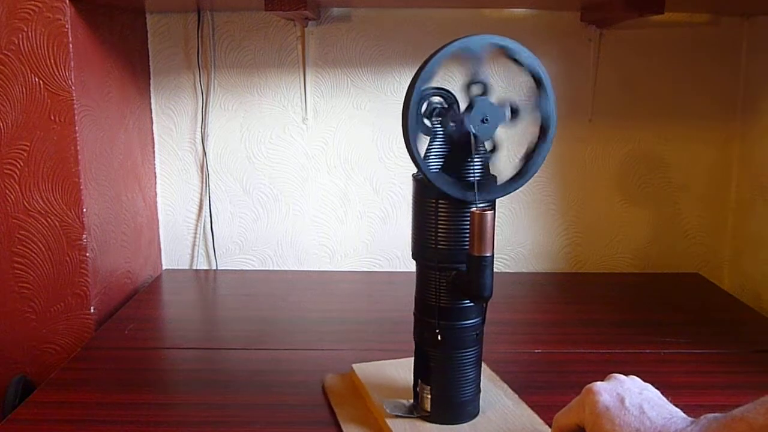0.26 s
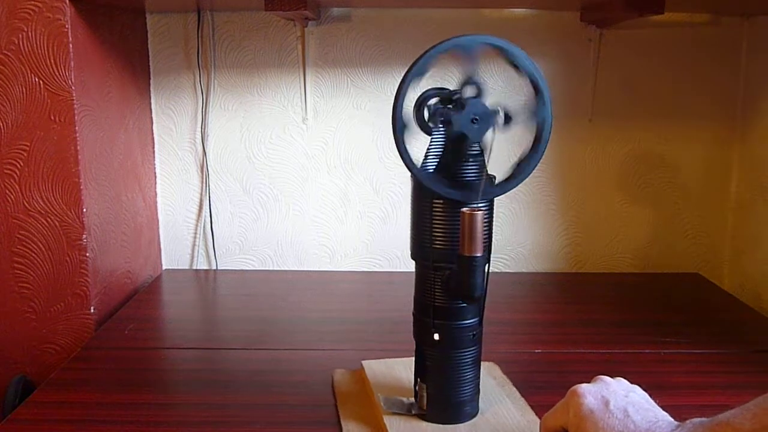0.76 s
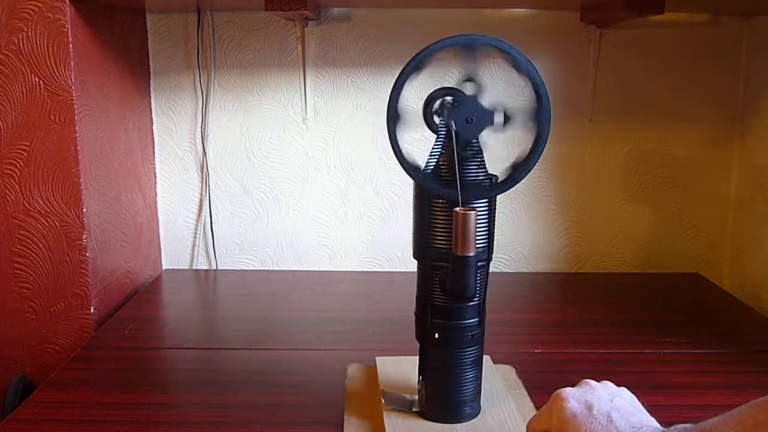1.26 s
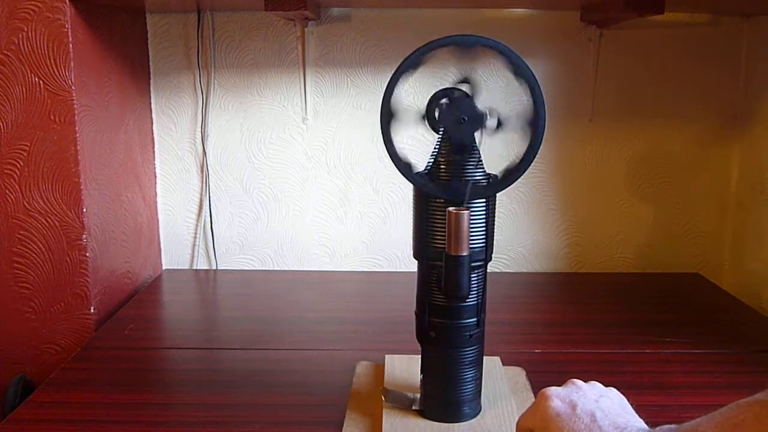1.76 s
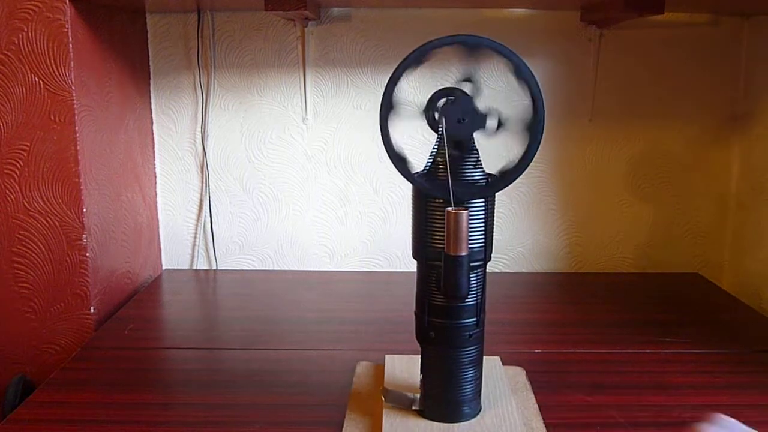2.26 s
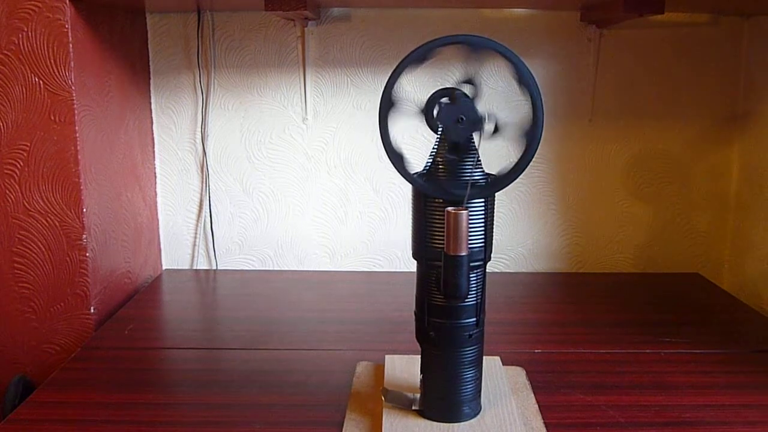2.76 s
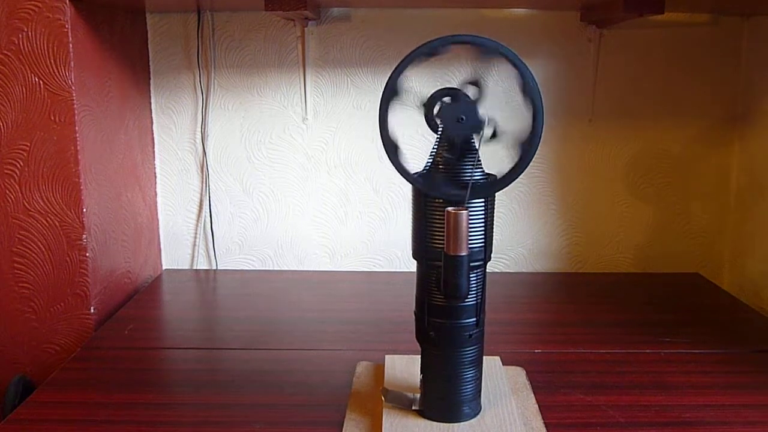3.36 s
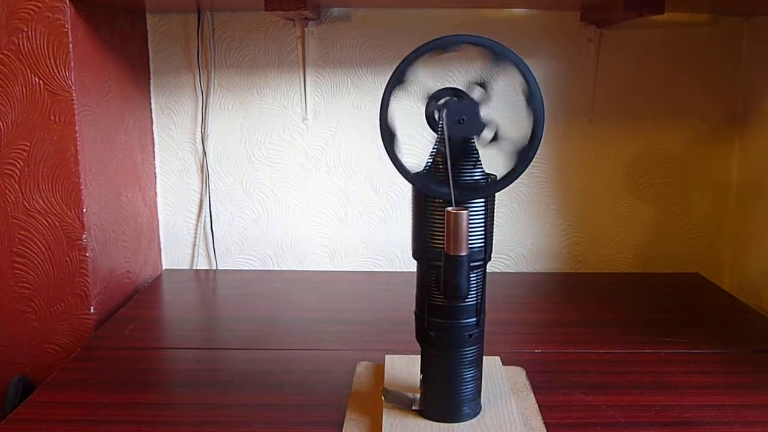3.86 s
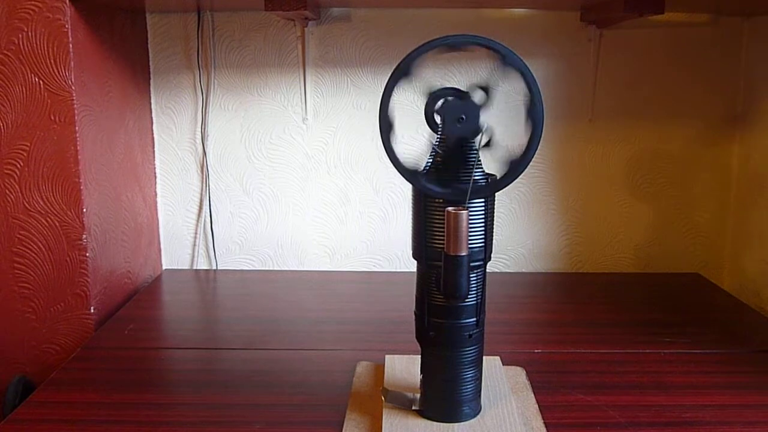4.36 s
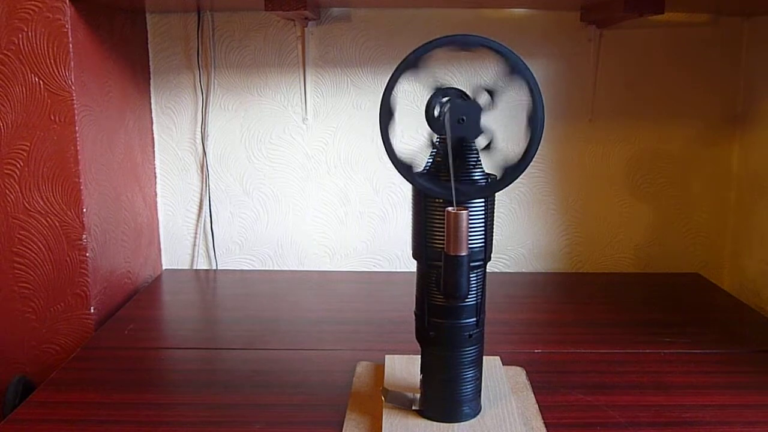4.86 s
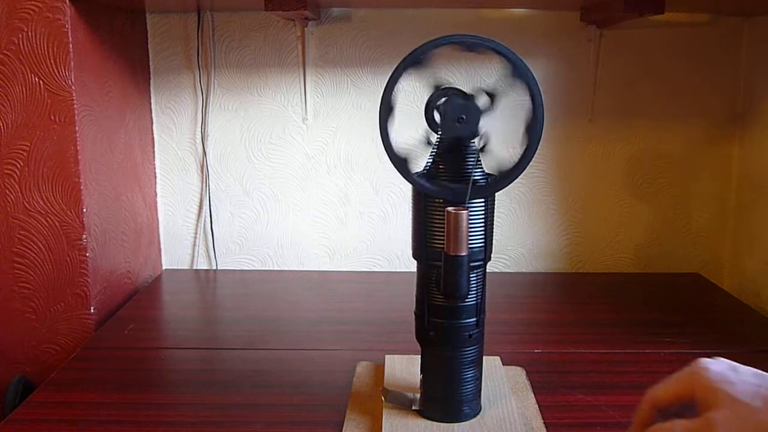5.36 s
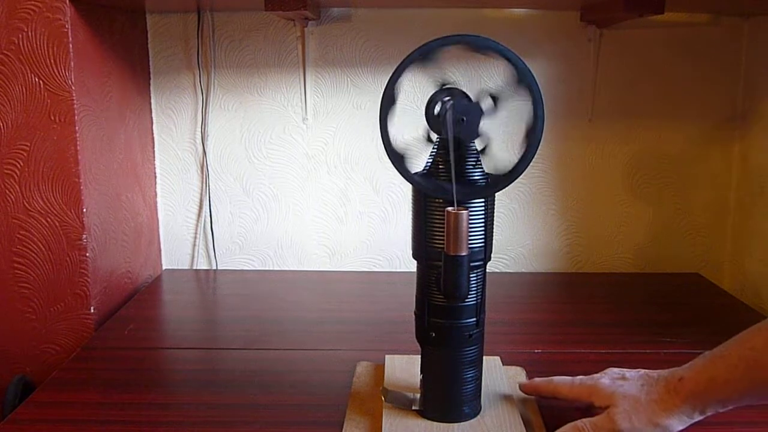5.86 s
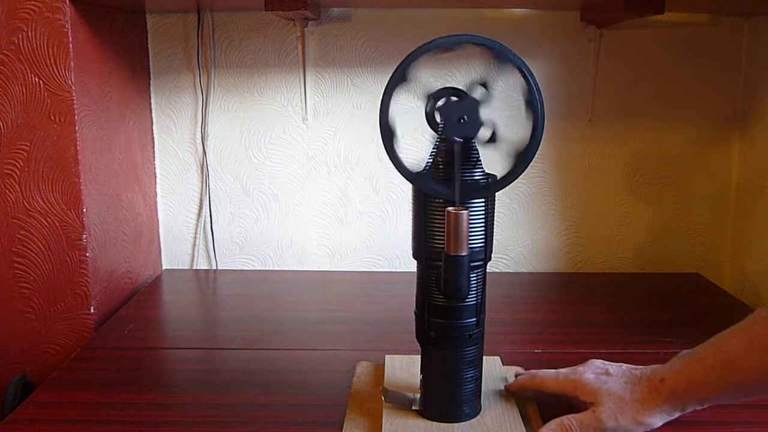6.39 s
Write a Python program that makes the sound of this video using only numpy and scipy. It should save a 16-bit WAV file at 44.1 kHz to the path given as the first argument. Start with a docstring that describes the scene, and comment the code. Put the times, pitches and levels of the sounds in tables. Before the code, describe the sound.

A small tin-can engine clatters steadily at five turns a second, each turn a scrapy metallic knock and softer tick, over a low burner rush.

```python
"""In an alcove, a small tin-can hot-air engine runs at about five turns a second on a wooden bench.
Once a turn the loose crank linkage scrapes, rattles and knocks the can; half a turn later
the piston rubs back with a softer tick. Rubbing and bouncing forces set off the metal parts' resonances.
The base board slides briefly at the start, and two dry ticks stray in later.
Shaped noise makes the rush of burner and room and a hiss; sine waves make a faint hum and whine."""
import sys
import numpy as np
from scipy import signal
from scipy.fft import rfft, irfft, next_fast_len
from scipy.io import wavfile
from scipy.ndimage import map_coordinates

SR = 44100
rng = np.random.default_rng(int(sys.argv[2]) if len(sys.argv) > 2 else 0)


def output_pcm(signal):
    """Save a mono or channel-first signal as 16-bit PCM at the path in sys.argv[1].

    Samples are clipped to [-1, 1] before scaling.
    """
    pcm = np.clip(np.atleast_2d(signal).T, -1, 1) * 32767
    wavfile.write(sys.argv[1], SR, np.round(pcm).astype(np.int16))


N = 292108  # length in samples

# how strongly the base board slides when nudged round on the bench: (t/s, level/dB)
BOARD_SLIDE = [(0, -57), (.25, -60), (.34, -77), (.6, -110)]
# resonances of the base board: (f/Hz, width/Hz, level/dB)
BOARD_MODES = [(380, 150, 2), (577, 78, 0), (1613, 16, 10.5), (1490, 340, -10.5)]
# tone balance of the burner and room rush: (f/Hz, level per Hz/dB)
RUSH_COLOUR = [(20, -19.5), (45, -10), (70, -6), (100, -4), (130, -1), (165, -2), (210, -0.5), (330, -3),
               (480, -7), (800, -10), (1300, -14), (2400, -21), (4500, -27.5), (8000, -35)]
# faint hum tones: (f/Hz, level/dB before wavering)
HUM_TONES = [(200.2, -61), (129.83, -68)]
# tone balance of the electronic hiss: (f/Hz, level per Hz/dB)
HISS_COLOUR = [(300, -7), (2000, -0.5), (4800, 0), (7500, -2)]
# thin electronic whine: (f/Hz, level/dB)
WHINE_TONES = [(3111, -81), (6222, -80), (6666.6, -78), (7530, -87.5), (8470, -86)]

# flywheel speed: (t/s, speed/turns per minute)
FLYWHEEL_SPEED = [(0, 299.1), (2.2, 302.1), (3.5, 302.6), (5.2, 302.3), (6.3, 300.6)]
FIRST_TURN_S = .1256
# once settled, the loose rod repeats three catches, soft, hard, a little less hard: (level change/dB)
SETTLED_S = 2.2
CATCH_PATTERN = [-3.5, 2, 1.5]
# single turns on which the rod is caught more softly: (t/s, catch level change/dB)
SOFTER_CATCHES = [(.33, -4), (1.33, -3), (3.71, -7.5), (4.31, -3)]
# load on the linkage, which eases for a while: (t/s, level/dB)
LINKAGE_LOAD = [(0, -1.5), (1, .5), (3.3, 0), (4.15, -3), (5, -1), (6.6, -.5)]
# how each contact answers catch and load: (base level/dB, dB per dB of catch, dB per dB of load)
RING_RESPONSE = (-56.3, 1.0, .4)
SCRAPE_RESPONSE = (-57.5, 0.2, .8)
KNOCK_RESPONSE = (-51, .15, 1.1)
RETURN_RESPONSE = (-63, -0.22, -.8)

# resonances of the crank pin: (f/Hz, width/Hz, level/dB)
PIN_MODES = [(4000, 380, -1.5), (2200, 160, -2)]
# tone balance of scraping metal: (f/Hz, level per Hz/dB)
SCRAPE_COLOUR = [(150, -25.5), (450, -2.5), (1100, -2.5), (2400, -7.5), (3600, -2), (5500, -11),
                 (8000, -19.5)]
# resonances of the crank bracket: (f/Hz, width/Hz, level/dB)
BRACKET_MODES = [(1400, 240, -7.5), (1850, 140, 0.5), (2123, 74, 5.5), (3986, 110, -2.5), (4916, 70, 1),
                 (5330, 84, -4)]
# ringing modes of the wire rod: (f/Hz, level/dB before random spread, time to fall 60 dB/s)
ROD_MODES = [(2755, -3, .065), (2785, -4, 0.065), (2862, -4.5, 0.091), (2965, -7, 0.087),
             (3060, -5.5, 0.087)]
ROD_DETUNE = .005  # typical pitch stray, as a share: the rod is caught at a new place each turn
# resonances of the can on its board: (f/Hz, width/Hz, level/dB)
CAN_MODES = [(282.2, 14, 0), (357.7, 26, -4.5), (439.5, 27, -11.5), (619, 25, -12), (672, 30, -16.5),
             (841.3, 59, -18), (1029.6, 22, -14)]
# resonances of the piston's cylinder: (f/Hz, width/Hz, level/dB)
CYLINDER_MODES = [(905, 72, -5), (1275, 96, 4), (1660, 540, -9.5), (2095, 160, -12), (3720, 70, -13),
                  (4590, 120, -5.5), (4740, 19, -6)]
RUB_DB_PER_S = .3  # the piston's rub grows as the engine runs
# stray dry ticks: (t/s, impulse level/dB)
STRAY_TICKS = [(3.579, -28), (3.989, -33)]

# fading of the highest treble: (f/Hz, level/dB)
TREBLE_FADE = [(7550, 0), (8000, -6), (8400, -12.5), (8700, -21), (8900, -35)]
TOP_HZ = 8877  # the sound has no treble from here up


def amp(db):
    """Turn decibels into a plain factor."""
    return 10 ** (np.asarray(db) / 20)


def unit(x):
    """Scale to an rms of 1."""
    return x / np.sqrt(np.mean(x ** 2) + 1e-20)


def colour(points):
    """Gain against frequency, drawn through (f/Hz, level/dB) points on a log axis."""
    f, db = np.transpose(points)
    return lambda hz: amp(np.interp(np.log(hz + 1), np.log(f), db))


def body(modes):
    """Summed resonances of a solid part: each answers most at its own pitch, then dies away."""
    def response(hz):
        return sum(
            amp(db) * 1j * hz * width / (centre * centre - hz * hz + 1j * hz * width)
            for centre, width, db in modes)
    return response


def filtered(x, response):
    """Multiply the spectrum of x by a response; padding leaves room for ringing."""
    size = next_fast_len(N + SR // 2)
    hz = np.fft.rfftfreq(size, 1 / SR)
    return irfft(rfft(x, size) * response(hz), size)[:N]


def through(x, response):
    """Send a broadband force through a response while roughly keeping its power."""
    def even_power(hz):
        gain = response(hz)
        return unit(np.abs(gain)) * np.exp(1j * np.angle(gain))
    return filtered(x, even_power)


def wobble(rate):
    """A smooth random curve with rate knots a second."""
    knots = rng.standard_normal(int(N * rate / SR) + 4)
    return map_coordinates(knots, [np.arange(N) * rate / SR])


def friction(rate):
    """Rubbing as a force of rms 1, made of about rate tiny random slips a second."""
    chance, size = rng.random(N), rng.standard_normal(N)
    slips = chance < rate / SR
    return unit(slips * (np.sign(size) + size / 2))


def board():
    """The base board slides briefly over the bench; tiny slips excite its resonances."""
    s, db = np.transpose(BOARD_SLIDE)
    strength = amp(np.interp(np.arange(N) / SR, s, db))
    return strength * through(friction(rate=1500), body(BOARD_MODES))


def alcove(x, t60, wet_db):
    """Close walls answer with a short dense tail, made of fading noise; t60 in seconds."""
    t = np.arange(SR // 2) / SR
    tail = rng.standard_normal(len(t)) * amp(-60 * t / t60) * (t > .003)
    echo = signal.fftconvolve(x, tail / np.linalg.norm(tail))[:N]
    return x + amp(wet_db) * echo


def background():
    """Burner and room rush as shaped noise; the low rumble flutters and a faint hum wavers."""
    t = np.arange(N) / SR
    noise = through(rng.standard_normal(N), colour(RUSH_COLOUR))
    rumble = filtered(noise, lambda hz: 1 / (1 + (hz / 420) ** 4))
    fluttering = amp(0.41 * wobble(11)) * rumble
    rush = amp(-50.5) * (noise - rumble + fluttering)
    hum = np.zeros(N)
    for hz, db in HUM_TONES:
        level = amp(db + 4.2 * wobble(7))
        hum += level * np.sin(2 * np.pi * hz * t + 1.2 * wobble(9))
    return rush + hum


def electronics():
    """Electronic hiss is shaped noise; the thin whine is sine waves with slightly unsteady phase."""
    t = np.arange(N) / SR
    hiss = amp(-61.0) * through(rng.standard_normal(N), colour(HISS_COLOUR))
    whine = np.zeros(N)
    for hz, db in WHINE_TONES:
        whine += amp(db) * np.sin(2 * np.pi * hz * t + 0.1 * wobble(8.7))
    return hiss + whine


def turn_starts():
    """Times in seconds at which the crank pin lets go, once per flywheel turn."""
    s, rpm = np.transpose(FLYWHEEL_SPEED)
    starts = [FIRST_TURN_S]
    while starts[-1] < N / SR:
        starts.append(starts[-1] + 60 / np.interp(starts[-1], s, rpm))
    return np.array(starts[:-1])


def turn_levels(law):
    """A contact's level in dB on each turn, from how hard the rod is caught and from the load."""
    starts = turn_starts()
    settled = starts > SETTLED_S
    catch_db = np.zeros(len(starts))
    catch_db[settled] = np.resize(CATCH_PATTERN, settled.sum())
    for s, db in SOFTER_CATCHES:
        nearest = np.argmin(np.abs(starts - s))
        catch_db[nearest] += db
    load_db = np.interp(starts, *np.transpose(LINKAGE_LOAD))
    level_db, per_catch, per_load = law
    return level_db + per_catch * catch_db + per_load * load_db


def strokes(levels_db, delay, rise, fall):
    """Contact pressure swells and dies once a turn, peaking delay seconds after the turn starts."""
    t, pressure = np.arange(N) / SR, np.zeros(N)
    for start, db in zip(turn_starts(), levels_db):
        near = slice(max(0, int((start - .1) * SR)), int((start + .3) * SR))
        from_peak = t[near] - start - delay
        steps = np.where(from_peak < 0, from_peak / rise, from_peak / fall)
        pressure[near] += amp(db) * np.exp(-steps ** 2)
    return pressure


def rod(levels_db, delay, attack, phase_scatter):
    """The wire rod is set ringing once a turn; its close modes beat against each other."""
    t = np.arange(-SR // 100, SR // 6) / SR
    hz, db, t60 = np.transpose(ROD_MODES)[:, :, None]
    # contact builds up for a few milliseconds, then the rod rings freely
    shape = np.where(t < 0, np.exp(-(t / attack) ** 2), amp(-60 * np.abs(t) / t60))
    out = np.zeros(N + SR)
    for start, level_db in zip(turn_starts(), levels_db):
        phase, size, stray = rng.standard_normal((3, len(ROD_MODES), 1))
        pitch = hz * (1 + ROD_DETUNE * stray)
        tones = np.sin(2 * np.pi * pitch * t + phase_scatter * phase)
        ring = np.sum(amp(db + size) * shape * tones, axis=0)
        first = round((start + delay + t[0]) * SR)
        out[first:][:len(t)] += amp(level_db) * unit(ring)
    return out[:N]


def linkage():
    """The crank pin lets go, slides across its play, catches the rod and rebounds on it."""
    ring_db, scrape_db = turn_levels(RING_RESPONSE), turn_levels(SCRAPE_RESPONSE)
    release = strokes(scrape_db, delay=0.00051, rise=0.0015, fall=0.0017)
    pin = amp(-2) * through(release * friction(rate=5000), body(PIN_MODES))
    slide = strokes(scrape_db, delay=.0095, rise=.009, fall=0.013)
    scrape = amp(-2.0) * through(slide * friction(rate=7000), colour(SCRAPE_COLOUR))
    bracket = amp(-3.0) * through(slide * friction(rate=7000), body(BRACKET_MODES))
    catch = rod(ring_db - 12.5, delay=.0103, attack=0.006, phase_scatter=1.3)
    rebound = rod(ring_db - 19.0, delay=.025, attack=.006, phase_scatter=2.5)
    return pin + scrape + bracket + catch + rebound


def contacts(levels_db, delay, spacing, scatter, loss_db, count):
    """Once a turn a loose joint lands count times, each bounce weaker on average; times in seconds."""
    bounce = np.arange(count)
    chance = rng.standard_normal((len(levels_db), 2, count))
    s = turn_starts()[:, None] + delay + spacing * bounce + scatter * chance[:, 0]
    size = amp(np.asarray(levels_db)[:, None] - loss_db * bounce + 1.1 * chance[:, 1])
    place = np.clip(s * SR, 0, N).astype(int)
    return np.bincount(place.ravel(), size.ravel(), N + 1)[:N]


def knocks():
    """The load reverses twice a turn, and the bouncing joint thumps the can's resonances."""
    knock_db, return_db = turn_levels(KNOCK_RESPONSE), turn_levels(RETURN_RESPONSE)
    down = contacts(knock_db + 27.5, delay=.009, spacing=.007, scatter=.002, loss_db=2.5, count=3)
    back = contacts(return_db + 31.0, delay=.111, spacing=0.0035, scatter=.003, loss_db=3, count=2)
    return through(down + back, body(CAN_MODES))


def piston():
    """The piston rubs along its cylinder on the way back, and the rod ticks lightly at the end."""
    return_db = turn_levels(RETURN_RESPONSE)
    rub_db = return_db + RUB_DB_PER_S * turn_starts()
    rub = strokes(rub_db, delay=0.1, rise=.028, fall=0.021)
    wall = amp(-0.5) * through(rub * friction(rate=2000), body(CYLINDER_MODES))
    grit = amp(-6.5) * through(rub * friction(rate=900), colour(SCRAPE_COLOUR))
    tick = rod(return_db - 18.5, delay=0.12, attack=0.004, phase_scatter=2.2)
    return wall + grit + tick


def snaps():
    """Each stray dry tick is a force lasting a single sample."""
    force = np.zeros(N)
    for s, db in STRAY_TICKS:
        force[round(s * SR)] = amp(db)
    return force


def scene():
    """The engine in its alcove, over the background, with dry ticks and electronic noise."""
    dry_engine = linkage() + knocks() + piston() + board()
    engine = alcove(dry_engine, t60=0.23, wet_db=-12.5)
    return (engine + snaps() + background() + electronics())[None]


def record(dry):
    """The highest treble fades and stops, and the signal rests slightly off zero."""
    offset = .0199  # share of full scale
    treble = colour(TREBLE_FADE)
    return filtered(dry[0], lambda hz: treble(hz) * (hz < TOP_HZ))[None] + offset


dry = scene()
out = record(dry)
output_pcm(out)
```